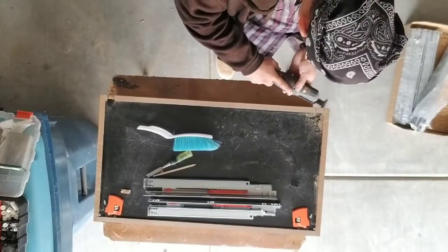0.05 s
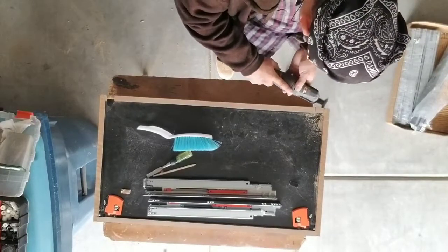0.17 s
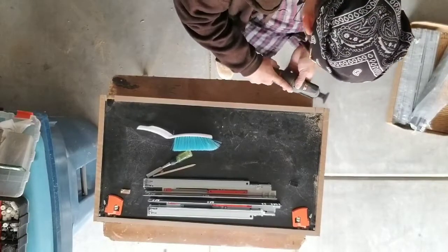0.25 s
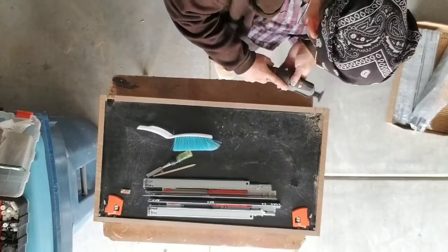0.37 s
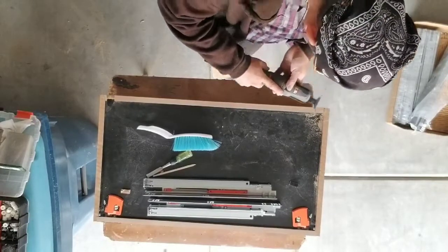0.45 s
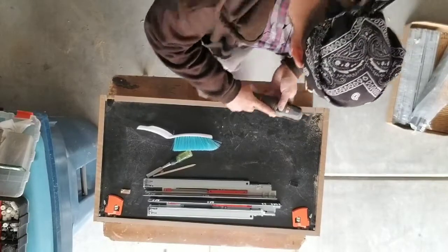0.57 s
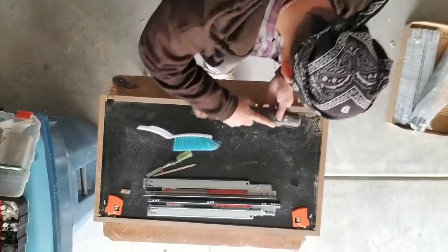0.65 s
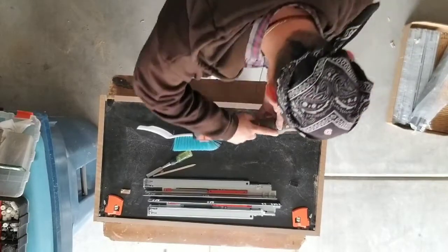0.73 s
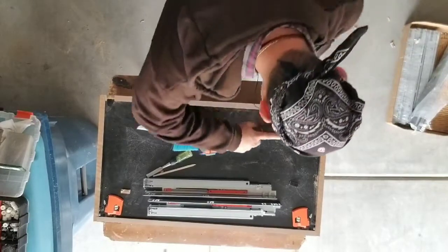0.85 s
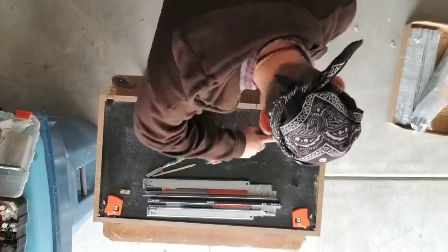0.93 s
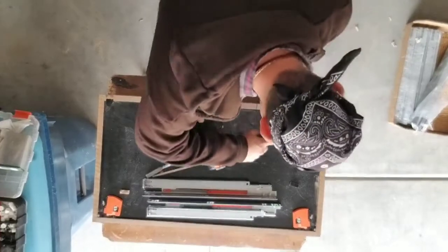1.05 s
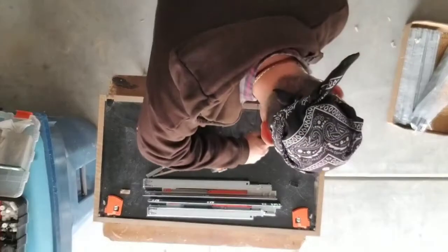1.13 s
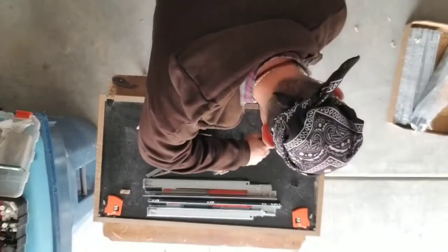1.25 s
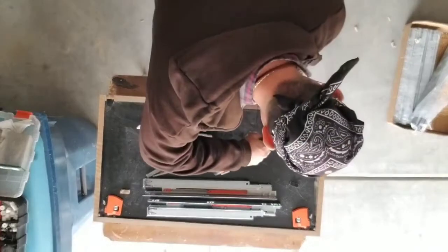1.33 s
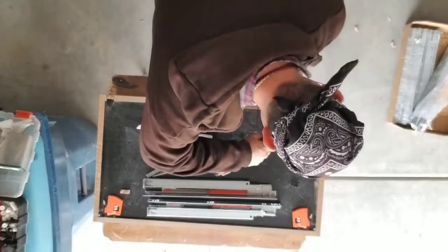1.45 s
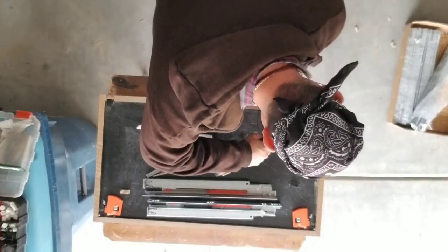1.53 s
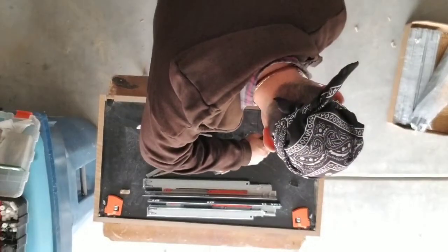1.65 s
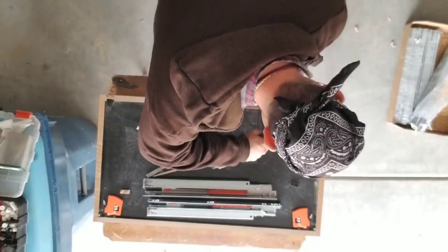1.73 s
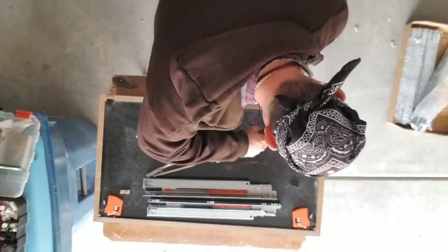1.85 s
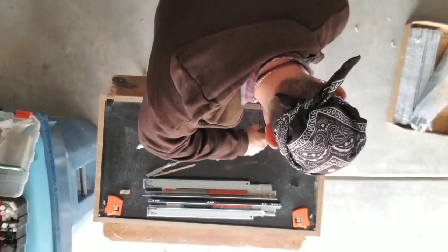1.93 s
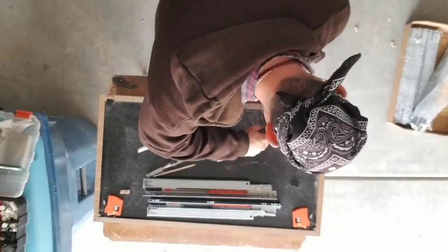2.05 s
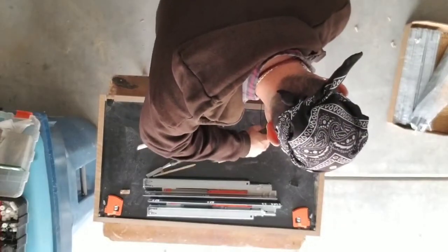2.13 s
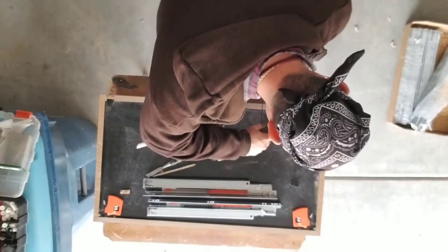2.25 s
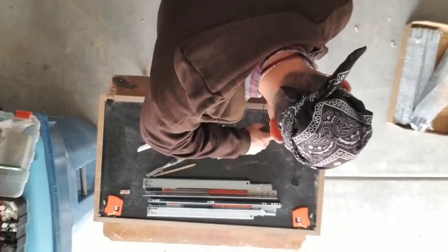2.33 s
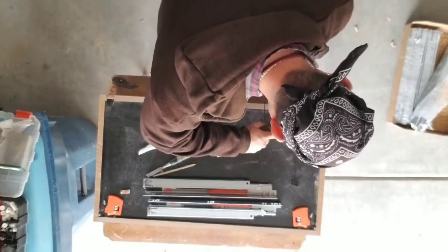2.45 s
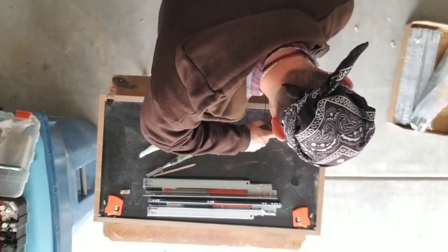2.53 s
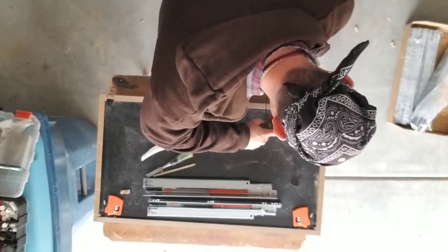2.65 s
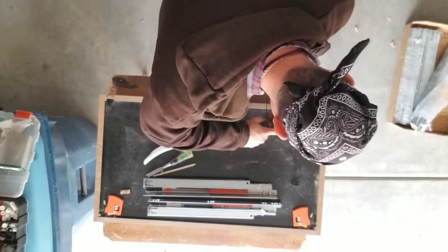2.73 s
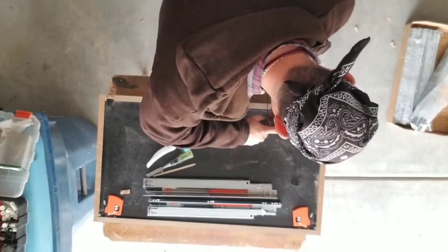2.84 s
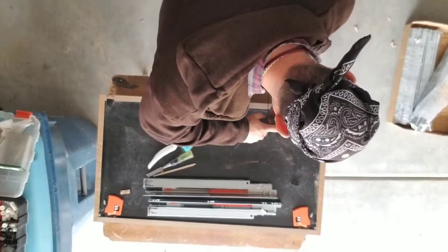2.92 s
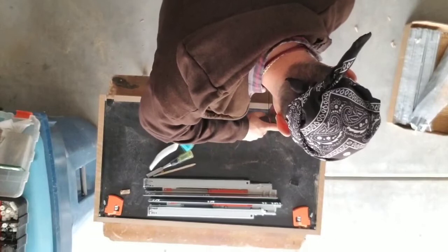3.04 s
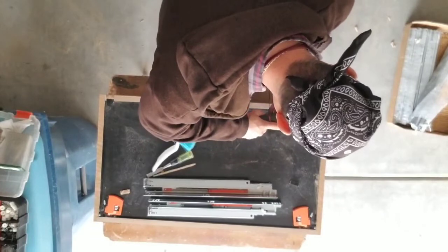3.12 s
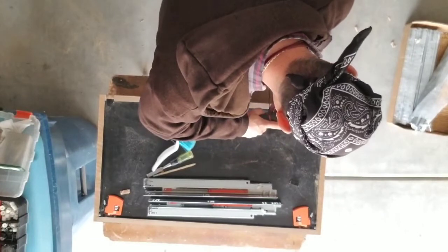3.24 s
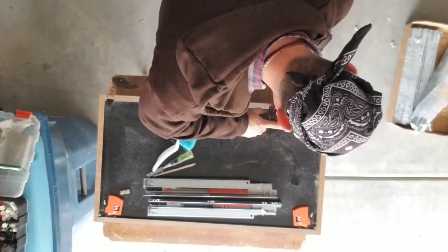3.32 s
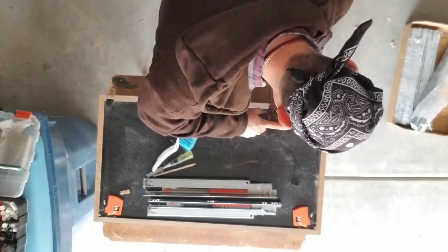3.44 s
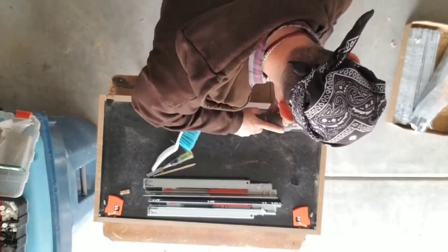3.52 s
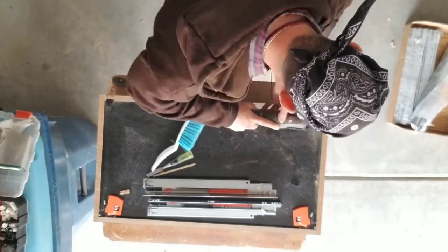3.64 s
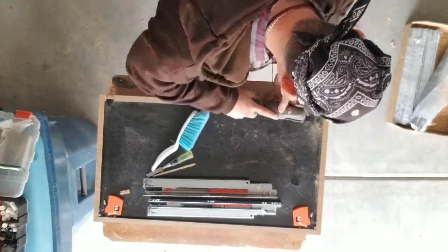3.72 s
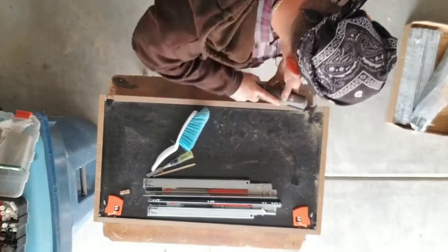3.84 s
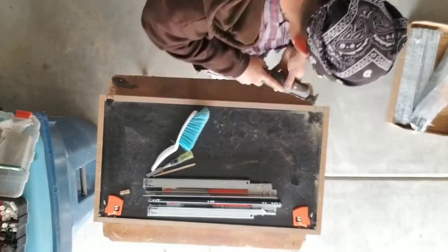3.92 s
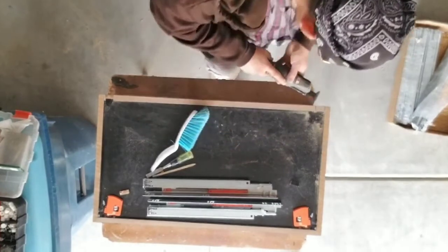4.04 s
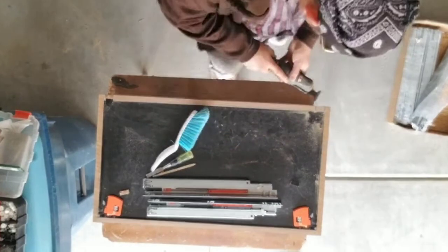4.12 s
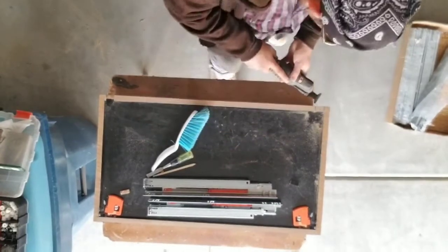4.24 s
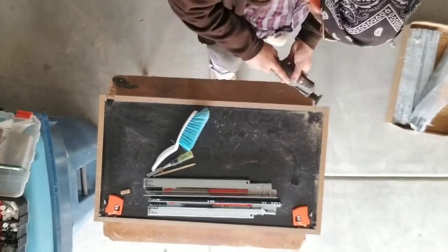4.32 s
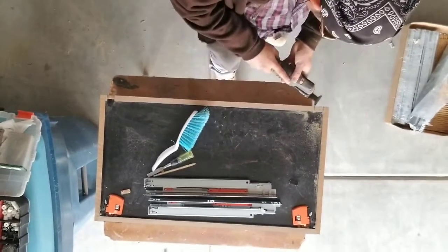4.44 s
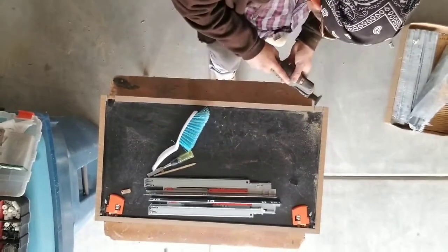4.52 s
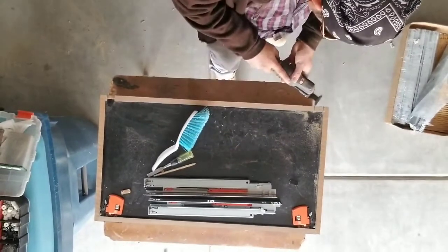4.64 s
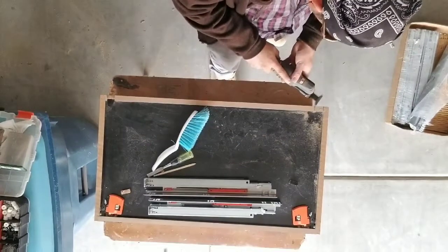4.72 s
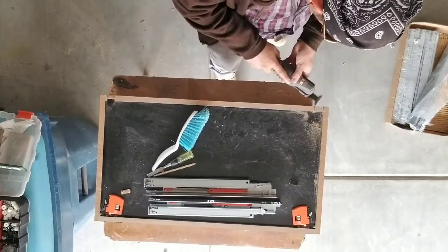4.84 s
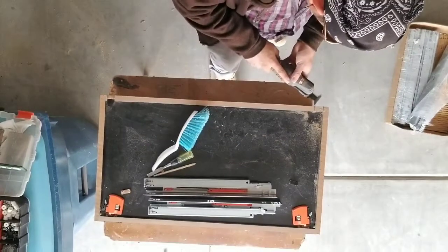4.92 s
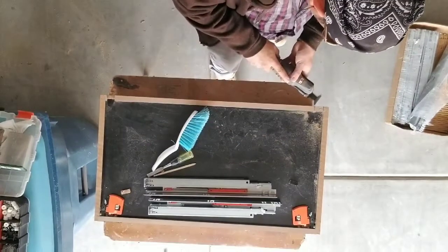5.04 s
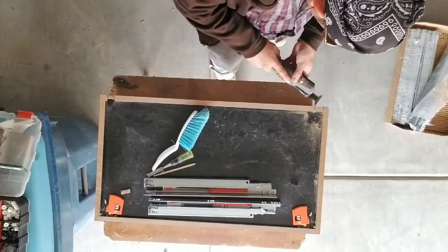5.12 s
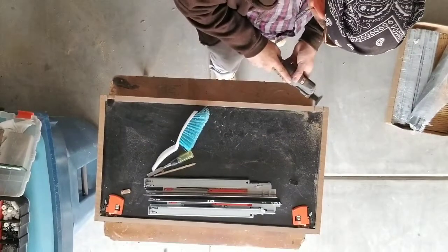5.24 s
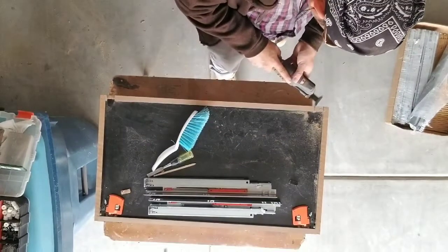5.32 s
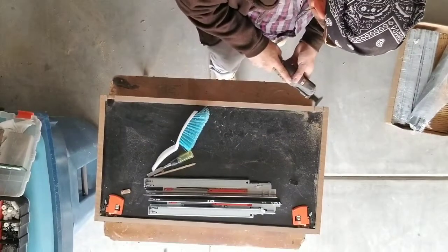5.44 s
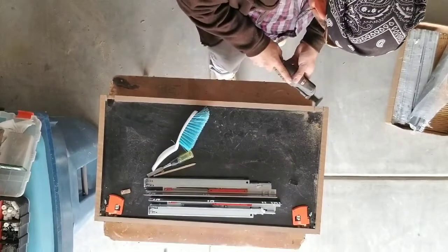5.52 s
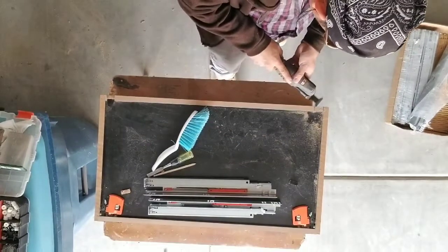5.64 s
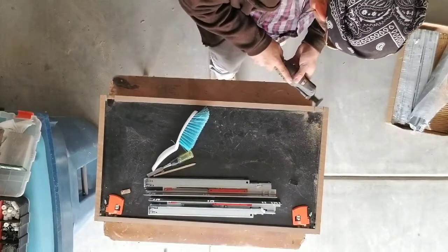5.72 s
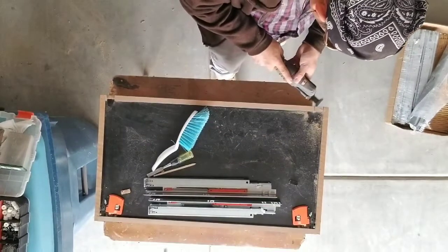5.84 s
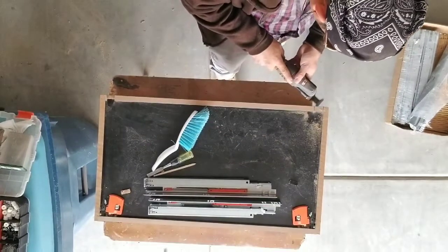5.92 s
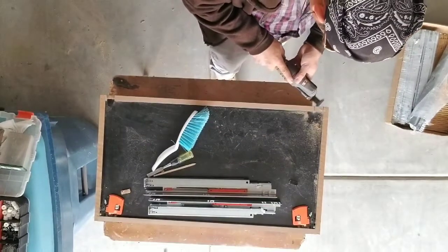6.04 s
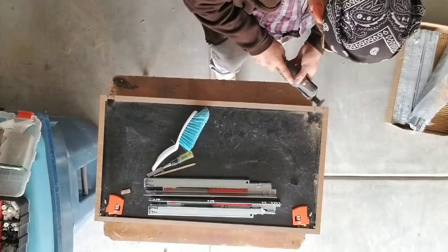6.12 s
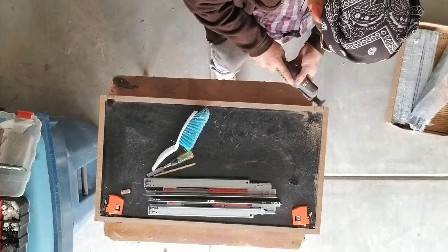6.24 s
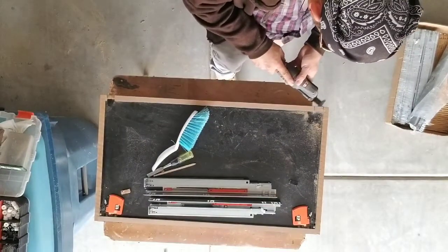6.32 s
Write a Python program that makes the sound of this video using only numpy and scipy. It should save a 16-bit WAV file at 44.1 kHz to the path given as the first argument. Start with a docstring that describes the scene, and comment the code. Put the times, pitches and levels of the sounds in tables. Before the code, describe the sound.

A raw, loud buzz is already running as an oscillating multi-tool trims a wooden bench rim, then stops almost at once. After a brief rustle and soft knocks, a longer cut follows, its pitch sagging under load with shifting overtones. Another pause holds low bumps and sliding sleeves, then a third cut starts hesitantly, jumps to full speed and runs nearly to the end. Hard garage walls ring; the microphone is fairly close, the tool slightly left.

```python
"""A raw buzz is heard at once: a cordless oscillating multi-tool trims the wooden rim of a bench top.
It works in three bursts in a hard-walled garage. Each swing of the blade strikes the wood, so the buzz
sags in pitch under load and turns ragged when the blade chatters. The teeth hiss like torn noise and the
motor drive whistles in narrow bands. In the pauses come soft knocks (short low rings) and rustling clothes."""
import sys
import numpy as np
from scipy import signal
from scipy.fft import rfft, irfft, next_fast_len
from scipy.io import wavfile
from scipy.ndimage import uniform_filter1d, map_coordinates

SR = 44100
rng = np.random.default_rng(int(sys.argv[2]) if len(sys.argv) > 2 else 0)


def materialize(psi):
    """Save the field psi as 16-bit PCM at rate SR to the path in sys.argv[1].

    A 1-D psi becomes a single channel; in a 2-D psi each row is a channel.
    """
    bounded = np.clip(np.atleast_2d(psi).T, -1, 1)
    quanta = np.round(bounded * 32767).astype(np.int16)
    wavfile.write(sys.argv[1], SR, quanta)


N = 281342
TIME = np.arange(N) / SR


def amp(db):
    """Turn decibels into a gain."""
    return 10 ** (np.asarray(db) / 20)


def unit(x):
    """Scale to an average strength (rms) of 1."""
    return x / np.sqrt(np.mean(x ** 2) + 1e-20)


def along(points, hz):
    """Read a value between (pitch, value) points, on a log pitch axis."""
    point_hz, values = np.transpose(points)
    return np.interp(np.log(hz + 1), np.log(point_hz + 1), values)


def curves(rows):
    """Join the rows into one smooth track per column after the time."""
    start_s, *columns = np.transpose(rows)
    return [np.interp(TIME, start_s, column) for column in columns]


def wobble(rate):
    """A smooth random curve with this many random points a second."""
    points = rng.standard_normal(int(N * rate / SR) + 4)
    return map_coordinates(points, [TIME * rate])


def held(on, off, attack_s, release_s):
    """Rise from 0 to 1, hold, and fall back."""
    rise = (TIME - on) / attack_s
    fall = 1 - (TIME - off) / release_s
    return np.clip(np.minimum(rise, fall), 0, 1)


def filtered(x, response):
    """Change the strength of each pitch in x by the given response."""
    size = next_fast_len(N + SR // 2)
    hz = np.fft.rfftfreq(size, 1 / SR)
    return irfft(rfft(x, size) * response(hz), size)[..., :N]


def noise(spectrum, channels=1):
    """Random noise of rms 1, shaped by the given spectrum."""
    white = rng.standard_normal((channels, N))
    return unit(filtered(white, lambda hz: amp(along(spectrum, hz))))


def band(hz, low_hz, high_hz, order=12):
    """Gain that keeps only the pitches between two steep edges."""
    low_edge = 1 + (low_hz / (hz + 1)) ** order
    high_edge = 1 + (hz / high_hz) ** order
    return 1 / np.sqrt(low_edge * high_edge)


# colour of the quiet room's noise: pitch_hz, relative level_db (per Hz)
AIR_COLOUR = [(15, -50.5), (25, -24), (106, -15), (154, -25.5), (301, -20), (354, -21), (573, -25),
              (927, -31), (15000, -45)]


def quiet_room():
    """Steady faint noise of the air, different in each ear."""
    return amp(-63.5) * noise(AIR_COLOUR, channels=2)


# how long the walls ring: pitch_hz, t60_s (time to fade by 60 dB)
GARAGE_RING = [(150, 1), (700, 0.64), (1020, 0.65), (1400, 0.56), (5000, 0.56), (12000, 0.36)]


def garage(x, direct_db, early_db, tail_db, early_t60=0.039, lead_s=0.000098, shadow_hz=9000):
    """Direct sound, dulled by the worker's body, leads on the left; bench and floor scatter it, walls ring."""
    hz, t, spectrum = signal.stft(rng.standard_normal((2, SR)), SR, nperseg=256)
    t60 = along(GARAGE_RING, hz)[:, None]
    tail = signal.istft(spectrum * amp(-60 * t / t60), SR, nperseg=256)[1]
    age = np.arange(tail.shape[1]) / SR
    early = rng.standard_normal(tail.shape) * amp(-60 * age / early_t60)
    answer = amp(tail_db) * tail / np.linalg.norm(tail[0])
    answer = answer + amp(early_db) * early / np.linalg.norm(early[0])
    sides = np.array([[1], [-1]])  # left early, right late

    def arrival(hz):
        """Shift the two sides apart in time and soften the treble."""
        return np.exp(1j * np.pi * hz * lead_s * sides) / np.hypot(1, hz / shadow_hz)

    return amp(direct_db) * filtered(x, arrival) + signal.fftconvolve(x[None], answer, axes=1)[:, :N]


# sleeves slide: start_s, end_s, level_db
RUSTLES = [(0.778, 1.074, -52), (3.97, 4.126, -50.5)]
# colour of the cloth noise: pitch_hz, relative level_db (per Hz)
CLOTH_COLOUR = [(100, -23.5), (300, 3), (600, -12), (1500, -8.5), (3000, -5.5), (4100, -1.5), (6500, -6.5),
                (9000, -19), (15000, -9)]


def rustle():
    """Sliding sleeves make soft noise in uneven bursts."""
    slides = sum(amp(db) * held(on, off, attack_s=0.091, release_s=.05) for on, off, db in RUSTLES)
    return slides * amp(1.1 * wobble(39)) * noise(CLOTH_COLOUR)[0]


# soft bumps on the bench: start_s, level_db, pitch_hz
BENCH_KNOCKS = [(.818, -49, 299.2), (0.851, -45.5, 293), (3.689, -46, 387.7), (3.759, -44.5, 410),
                (3.837, -47, 410), (3.915, -45, 422), (3.992, -45, 415), (4.073, -44.5, 407),
                (4.134, -53.5, 415)]


def knocks(t60, attack):
    """Each bump sets off a short low ring over a soft thud."""
    out = np.zeros(N)
    thud = noise([(100, -34.5), (280, 4), (450, -1.0), (700, -26.5), (2000, -66)])[0]
    for start_s, db, pitch_hz in BENCH_KNOCKS:
        t = np.maximum(TIME - start_s, 0)
        swell = (1 - np.exp(-t / attack)) ** 2
        ring = np.sin(2 * np.pi * pitch_hz * t)
        out += amp(db - 60 * t / t60) * swell * (ring + .5 * thud)
    return out


# trigger held: start_s, end_s, run_up_s
TRIGGER = [(-.01, 0.253, 0.0035), (1.06, 3.485, .075), (4.454, 6.382, .17)]
# where the motor catches: level change (dB) and share of its speed
CATCH_DB, CATCH_SPEED = -25.5, .82


def run_up():
    """Progress of the motor from catching (0) to full drive (1)."""
    progress = np.ones(N)
    for on, _, rise_s in TRIGGER:
        progress = np.where(TIME >= on, np.clip((TIME - on) / rise_s, 0, 1), progress)
    return progress


def running(coast_db_per_s, start_s=0.0054):
    """Loudness of the motor: it catches after the trigger, runs up, and fades after release."""
    bursts = []
    for on, off, _ in TRIGGER:
        start = np.clip((TIME - on) / start_s, 0, 1)
        bursts.append(start * amp(-coast_db_per_s * np.maximum(TIME - off, 0)))
    return np.max(bursts, axis=0) * amp(CATCH_DB * (1 - run_up()) ** 2.14)


# blade swings at full drive: start_s, rate_hz (the third burst begins on a half-pressed trigger)
SWINGS_FIRST = [(0.0, 249), (0.016, 250.3), (0.23, 260.6)]
SWINGS_SECOND = [(1.13, 260.5), (1.16, 271.7), (1.21, 278.6), (1.39, 282.6), (1.54, 264.4), (1.74, 259.9),
                 (1.81, 263.1), (2.24, 255.7), (2.32, 250.1), (2.82, 248), (3.11, 250.9), (3.16, 255.4),
                 (3.45, 252.4), (3.5, 257.4)]
SWINGS_HALF_TRIGGER = [(4.6, 219), (4.9, 237.8)]
SWINGS_THIRD = [(4.955, 273.3), (5.049, 281.2), (5.441, 280.4), (5.937, 275.1), (6.025, 268.4),
                (6.367, 264.7), (6.38, 260.3)]


def swing_rate(coast_hz_per_s=50):
    """Swings a second: low while the motor runs up, sinking after release."""
    rate_hz, = curves(np.vstack([SWINGS_FIRST, SWINGS_SECOND, SWINGS_HALF_TRIGGER, SWINGS_THIRD]))
    for (_, off, _), (on, _, _) in zip(TRIGGER, TRIGGER[1:]):
        coasting = np.interp(off, TIME, rate_hz) - coast_hz_per_s * (TIME - off)
        rate_hz = np.where((TIME > off) & (TIME < on), coasting, rate_hz)
    return rate_hz * (1 - (1 - CATCH_SPEED) * (1 - run_up()) ** 2)


# the blade bites the wood and buzzes cleanly: start_s, end_s, ragged_share (0-1), housing hum level_db
BLADE_BITES = [(-.03, 0.168, 0.06, -30), (1.142, 1.392, 0.05, -21.5), (1.546, 3.397, 0.03, -32.5),
               (4.895, 5.112, 0.06, -40.5), (5.287, 5.571, 0.05, -42.5), (5.659, 6.376, 0.01, -31)]
SEAT_S, UNSEAT_S = 0.046, 0.087  # time to settle into the wood and to slip out


def biting(loose, values):
    """A quantity that takes its own value in each bite and the loose value in between."""
    out = loose
    for (on, off, _, _), value in zip(BLADE_BITES, values):
        out = out + (value - loose) * held(on, off, SEAT_S, UNSEAT_S)
    return out


# the blade snags and jolts the bench: start_s, end_s, level_db
BLADE_SNAGS = [(2.699, 2.789, -44), (2.92, 3.07, -45), (3.46, 3.526, -31), (5.37, 5.458, -46)]
# colour of the bench's shaking: pitch_hz, relative level_db (per Hz)
SHAKE_COLOUR = [(20, -23.5), (50, -4), (78, 2.5), (140, -2), (200, -7), (350, 6), (600, -11), (1200, -40.5)]


def shudder(level_db):
    """The dragging teeth shake the bench and each snag jolts it; the rumble comes from all round."""
    jolts = sum(amp(db) * held(on, off, attack_s=0.027, release_s=0.044) for on, off, db in BLADE_SNAGS)
    return (amp(level_db + 1.6 * wobble(9)) + jolts) * noise(SHAKE_COLOUR, channels=2)


LOOSE_HUM_DB = -42.5  # hum between bites, on the scale of the bite table
HUM_FULL_HZ, HUM_DB_PER_HZ = 249.7, 0.6  # below this swing rate the hum fades


def hum(turns, rate_hz):
    """The housing rocks at the swing rate, most at speed and while the wood holds the blade."""
    housing_db = biting(LOOSE_HUM_DB, [db for _, _, _, db in BLADE_BITES])
    housing_db = housing_db - HUM_DB_PER_HZ * np.maximum(HUM_FULL_HZ - rate_hz, 0)
    tone = np.sqrt(2) * np.sin(2 * np.pi * turns)
    return amp(housing_db - 1.0 + 0.55 * wobble(7)) * tone


# bands of the motor drive: pitch_hz, width_hz, relative level_db
WHISTLE_BANDS = [(11810, 110, 5), (12600, 160, -8), (15200, 150, 4.5)]


def whistle(level_db):
    """The motor drive sings as noise squeezed into a few narrow, fuzzy bands."""
    def peaks(hz):
        """Add up one narrow peak per band."""
        return sum(amp(db) / (1 + (2 * (hz - centre) / width) ** 2) for centre, width, db in WHISTLE_BANDS)

    return amp(level_db + 3.0 * wobble(10)) * unit(filtered(rng.standard_normal(N), peaks))


def scrape(turns, depth):
    """Noise that swells once in every swing."""
    return unit(rng.standard_normal(N) * np.exp(depth * np.cos(2 * np.pi * turns)))


# colour of the teeth's hiss: pitch_hz, relative level_db (per Hz)
TEETH_COLOUR = [(400, -10.5), (900, -5.5), (2500, 1), (5500, 6.5), (7500, -1.5), (9000, -3.5), (12000, 3.5),
                (14000, 0.5), (16000, -1)]


def teeth(turns, friction_db):
    """The teeth tear fibres on every swing: a hiss that swells with it."""
    hiss = unit(filtered(scrape(turns, depth=0.35), lambda hz: amp(along(TEETH_COLOUR, hz))))
    return amp(friction_db + 8.5 + 1.7 * wobble(30)) * hiss


def strikes(turns, scatter_db, return_share):
    """A sharp blow at each end of the swing; the weaker return drifts with the grip, so overtones swell."""
    count = int(turns[-1])
    chance = rng.standard_normal((count, 2))
    out = np.interp(np.arange(count), turns, np.arange(N))
    grip = wobble(3)[out.astype(int)]
    back = np.interp(np.arange(count) + .5 + .12 * grip, turns, np.arange(N))
    at = np.stack([out, back], axis=1).reshape(-1, 1)
    size = (amp(scatter_db * chance) * [1, -return_share]).reshape(-1, 1)
    # each blow is a narrow pulse placed between samples
    taps = at.astype(int) + np.arange(-8, 9)
    pulses = size * np.sinc(taps - at)
    return unit(np.bincount(np.clip(taps, 0, N - 1).ravel(), pulses.ravel(), N))


def shifting(x, patchy_db):
    """As the contact creeps, neighbouring overtones swell and fade on their own, about ten times a second."""
    spectrum = signal.stft(x, SR, nperseg=1024)[2]
    field = rng.standard_normal(spectrum.shape)
    for _ in range(2):
        field = uniform_filter1d(field, size=7, axis=0)  # across pitch
        field = uniform_filter1d(field, size=5, axis=1)  # across time
    gain = amp(patchy_db * np.tanh(unit(field)))
    return unit(signal.istft(spectrum * gain, SR, nperseg=1024)[1][:N])


def moving_ring(x, centre_hz, width_octaves, lift_db):
    """Bring out a resonance whose centre glides, by lowering what lies away from it."""
    hz, t, spectrum = signal.stft(x, SR, nperseg=1024)
    distance = np.log2((hz[:, None] + 1) / np.interp(t, TIME, centre_hz)) / width_octaves
    gain = amp(lift_db * (np.exp(-distance ** 2) - 1))
    return unit(signal.istft(spectrum * gain, SR, nperseg=1024)[1][:N])


METAL_HZ, METAL_T60, METAL_DB = 1018.6, .8, -6.5  # pitch (Hz), time to fade by 60 dB (s), level (dB)


def metal(x):
    """Something metal on the bench rings along: a narrow ring that the buzz feeds and that lingers."""
    width_hz = np.log(1000) / (np.pi * METAL_T60)

    def ring(hz):
        """Response of one narrow resonance."""
        return 1j * hz * width_hz / (METAL_HZ ** 2 - hz ** 2 + 1j * hz * width_hz)

    return amp(METAL_DB) * filtered(x, ring)


# colour of tool and wood together: pitch_hz, relative level_db (per Hz)
BUZZ_COLOUR = [(440, -1), (505, -4), (560, 0), (680, -1), (770, -2.5), (840, -4.5), (1020, -1), (1290, 0.5),
               (1580, 0), (2000, -2.5), (2550, 1), (3700, 0.5), (5200, 0.5), (7800, -8)]
# rings of bench frame, top and rim move with the contact; one list per burst: start_s, level_db, centre_hz
FRAME_RING = [
    [(0.02, -22.5, 741), (0.226, -28.5, 515.2), (0.26, -30, 590)],
    [(1.13, -29.5, 609), (1.2, -30.5, 548), (1.74, -29.5, 792.8), (2.24, -21.5, 768), (2.3, -27, 574),
     (2.4, -38, 782), (2.67, -27, 558), (2.73, -25, 723), (2.92, -39, 776), (3.0, -27, 531),
     (3.15, -26.5, 750), (3.5, -29, 749)],
    [(4.6, -29, 755), (5.09, -23.5, 586), (5.148, -37, 674), (5.546, -23.5, 543), (5.658, -39, 834),
     (5.796, -37, 560), (6.182, -21.5, 550), (6.36, -36, 750)],
]
TOP_RING = [
    [(0.02, -27.5, 1010), (0.176, -24.5, 1015), (0.26, -36, 1033)],
    [(1.13, -26, 1090), (1.3, -34.5, 1380), (1.51, -22.5, 1120), (1.96, -15.5, 1215), (2.73, -24.5, 1080),
     (2.8, -19.5, 1300), (3.14, -19.5, 1030), (3.19, -15.5, 1290), (3.29, -14, 1029), (3.41, -17, 1280),
     (3.5, -30, 1000)],
    [(4.6, -20, 1200), (4.898, -28, 1200), (4.918, -23, 1280), (5.334, -28.5, 1107), (5.932, -21, 1390),
     (5.962, -27, 1364), (6.056, -25.5, 1310), (6.36, -20.5, 1280)],
]
RIM_RING = [
    [(0.02, -14.5, 2190), (0.17, -25.5, 1780), (0.202, -22, 2040), (0.26, -25, 1770)],
    [(1.13, -24, 1860), (1.22, -19.5, 2080), (1.41, -19.5, 1860), (1.56, -28.5, 2130), (1.66, -18.5, 1570),
     (1.84, -21.5, 1600), (2.07, -13.5, 1860), (2.21, -17.5, 2010), (2.41, -9.5, 1960), (2.46, -17.5, 2260),
     (3.25, -14.5, 1900), (3.31, -13.5, 2470), (3.45, -19, 1950), (3.5, -27, 2110)],
    [(4.6, -17.5, 1980), (4.814, -21, 2320), (4.992, -8.5, 1880), (5.256, -24.5, 2320), (5.374, -13, 2390),
     (5.608, -17.5, 2080), (5.678, -16, 2470), (5.726, -20.5, 2300), (6.162, -21.5, 1650),
     (6.29, -29.5, 2390), (6.36, -20.5, 2410)],
]
LOOSE_RAGGED = 0.87  # ragged share while the blade chatters between bites
CLATTER_DB = -13  # low clatter of the loose blade, over the frame's ring


def cutting(turns, blade_db):
    """Clean blows and ragged scraping ring the bench frame, its top, the rim and the blade."""
    frame_db, frame_hz = curves(np.vstack(FRAME_RING))
    top_db, top_hz = curves(np.vstack(TOP_RING))
    rim_db, rim_hz = curves(np.vstack(RIM_RING))
    chatter = np.clip(biting(LOOSE_RAGGED, [ragged for _, _, ragged, _ in BLADE_BITES]), 0, 1)
    blows = strikes(turns, scatter_db=-0.65, return_share=0.59)
    grit = scrape(turns, depth=.6)

    def part(low_hz, high_hz, ragged, patchy_db):
        """The share of the force that one part rings with."""
        clean = np.sqrt(np.abs(1 - ragged)) * shifting(blows, patchy_db)
        force = clean + np.sqrt(ragged) * grit
        return unit(filtered(force, lambda hz: amp(along(BUZZ_COLOUR, hz)) * band(hz, low_hz, high_hz)))

    # heavy parts average the chatter out and stay cleaner
    frame = part(low_hz=480, high_hz=830, ragged=.5 * chatter, patchy_db=-1.0)
    frame = moving_ring(frame, frame_hz, width_octaves=0.35, lift_db=6.5)
    clatter = part(low_hz=280, high_hz=450, ragged=0.89, patchy_db=0)
    frame = frame + amp(CLATTER_DB) * chatter * clatter
    top = part(low_hz=938, high_hz=1410, ragged=0.13 * chatter, patchy_db=4.0)
    top = moving_ring(top, top_hz, width_octaves=0.27, lift_db=11.5)
    rim = part(low_hz=1470, high_hz=3050, ragged=chatter, patchy_db=4.0)
    rim = moving_ring(rim, rim_hz, width_octaves=0.45, lift_db=11)
    rim_flutter_db = 1.53 * wobble(25)
    blade = part(low_hz=3350, high_hz=6690, ragged=chatter ** 0.81, patchy_db=12.5)
    bench = amp(frame_db + 0.76) * frame + amp(top_db - 0.87) * top
    return bench + amp(rim_db + 1.83 + rim_flutter_db) * rim + amp(blade_db) * blade


# how hard the teeth rub in each burst: start_s, level_db (the parts below add their own offsets)
RUB_FIRST = [(0.02, -28), (0.03, -34), (0.26, -30)]
RUB_SECOND = [(1.13, -25.5), (1.23, -22.5), (1.29, -25), (1.68, -31), (2.89, -26.5), (3.19, -31),
              (3.5, -29)]
RUB_THIRD = [(4.6, -29.5), (4.682, -28), (5.644, -26), (6.118, -30), (6.36, -29.5)]
FREE_HZ = 281.8  # swing rate without load
# level over the friction (dB), and its change as the swing slows (dB per Hz)
BLADE_DB, BLADE_DB_PER_HZ = 4.5, 0.3136
WHISTLE_DB, WHISTLE_DB_PER_HZ = -1.5, -0.2871
SHUDDER_DB, SHUDDER_DB_PER_HZ = -23, 0.3085


def scene():
    """The swing rate times the tool, friction and load set levels; it works a little to the left."""
    rate_hz = swing_rate()
    turns = np.cumsum(rate_hz * (1 + 0.00302 * wobble(70))) / SR
    friction_db, = curves(np.vstack([RUB_FIRST, RUB_SECOND, RUB_THIRD]))
    slow_hz = FREE_HZ - rate_hz
    sag_hz = slow_hz * biting(0, np.ones(len(BLADE_BITES)))  # the slowing that the wood causes
    blade_db = friction_db + BLADE_DB + BLADE_DB_PER_HZ * sag_hz
    whistle_db = friction_db + WHISTLE_DB + WHISTLE_DB_PER_HZ * slow_hz
    shudder_db = friction_db + SHUDDER_DB + SHUDDER_DB_PER_HZ * sag_hz

    rumble = running(coast_db_per_s=75) * shudder(shudder_db)
    # low sounds arrive mostly straight from the bench
    rocking = running(coast_db_per_s=85) * hum(turns, rate_hz)
    bumps = knocks(t60=0.16, attack=0.0016)
    low = garage(rocking + bumps, direct_db=1.2, early_db=-32.5, tail_db=-15.5)
    fizz = running(coast_db_per_s=100) * (teeth(turns, friction_db) + whistle(whistle_db))
    buzz = running(coast_db_per_s=84.5) * cutting(turns, blade_db)
    bright = buzz + metal(buzz) + fizz + rustle()
    bright = garage(bright, direct_db=-3.5, early_db=-4.5, tail_db=-4.0)
    left_right = amp([[1.1], [-1.1]])
    return (bright + low + rumble) * left_right + quiet_room()


TOP_HZ = 15780  # upper band limit


def record(dry):
    """The loudest peaks flatten at full scale, then the treble above the band limit is removed."""
    clipped = np.clip(dry, -1, 1)
    return filtered(clipped, lambda hz: np.clip((TOP_HZ - hz) / 300 + .5, 0, 1))


dry = scene()
out = record(dry)
materialize(out)
```